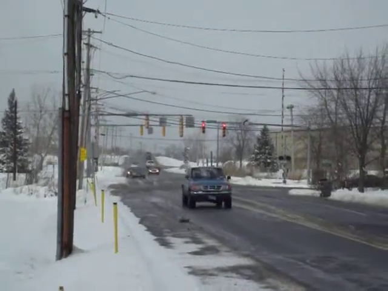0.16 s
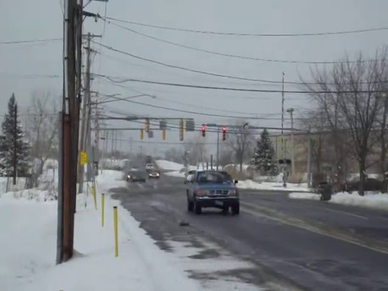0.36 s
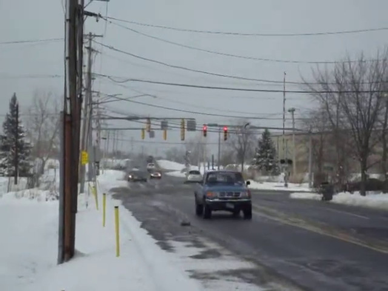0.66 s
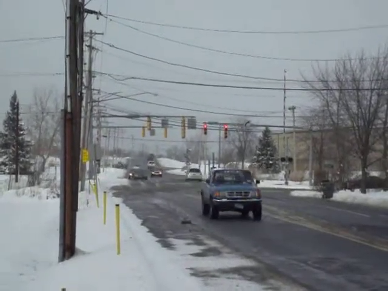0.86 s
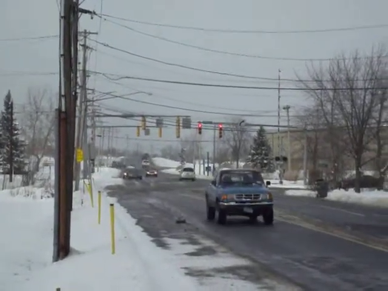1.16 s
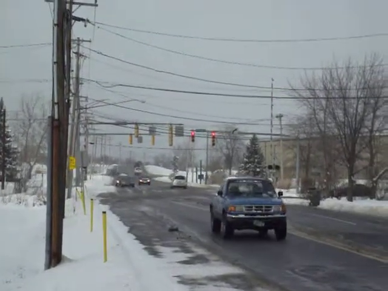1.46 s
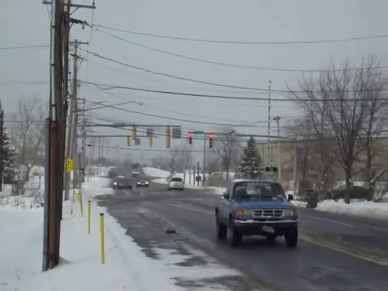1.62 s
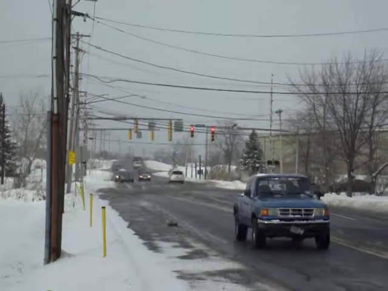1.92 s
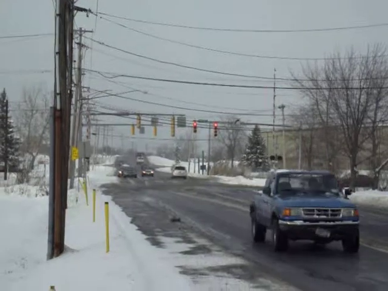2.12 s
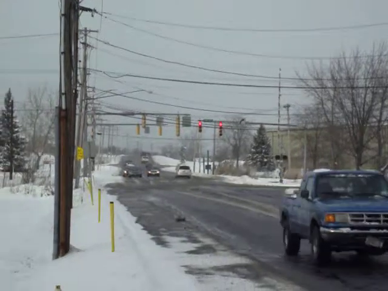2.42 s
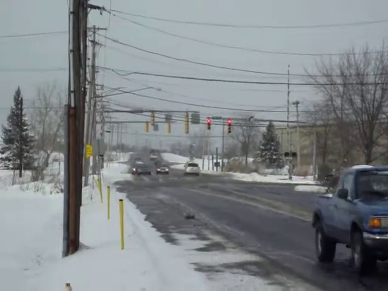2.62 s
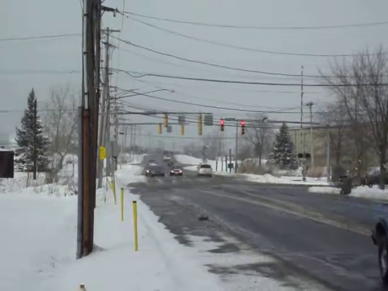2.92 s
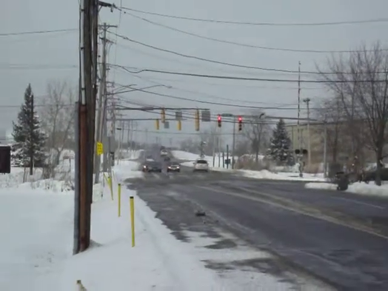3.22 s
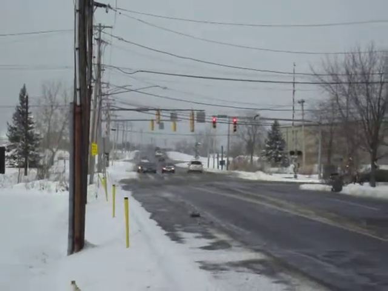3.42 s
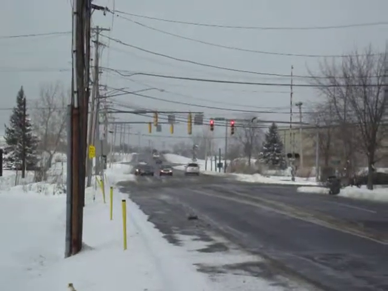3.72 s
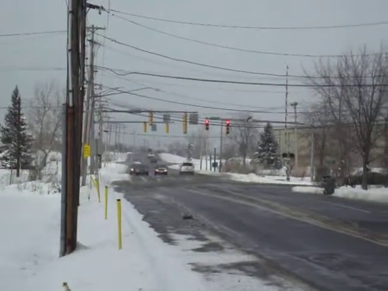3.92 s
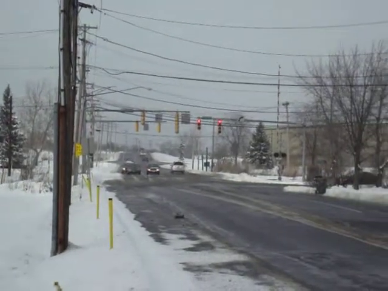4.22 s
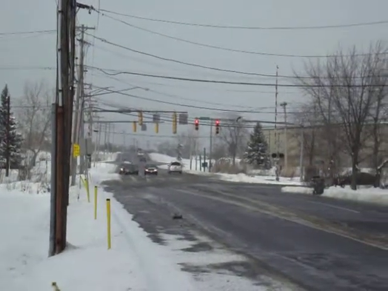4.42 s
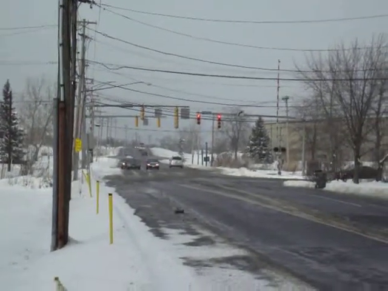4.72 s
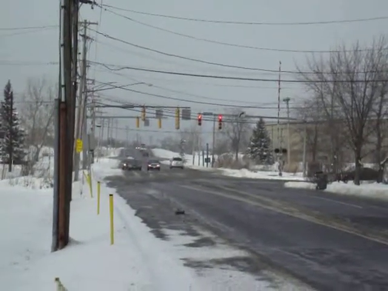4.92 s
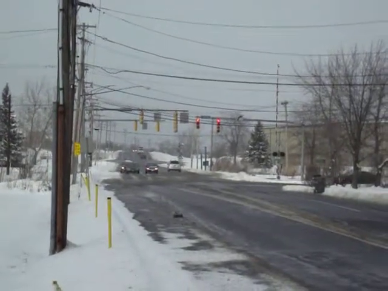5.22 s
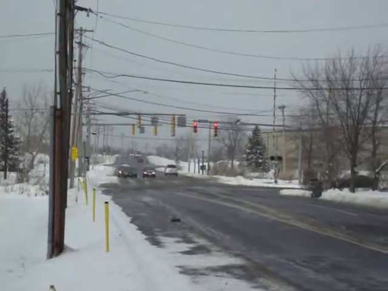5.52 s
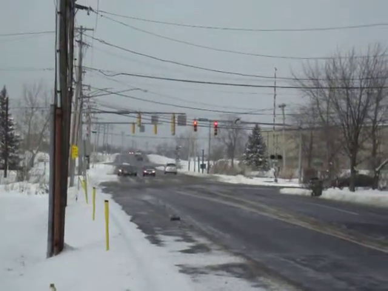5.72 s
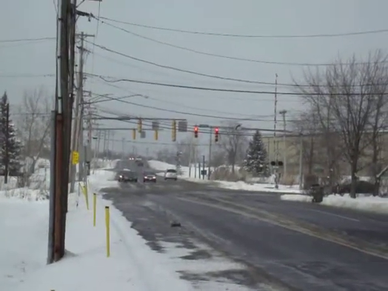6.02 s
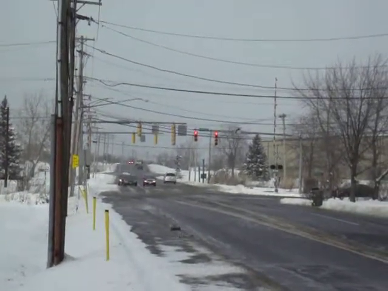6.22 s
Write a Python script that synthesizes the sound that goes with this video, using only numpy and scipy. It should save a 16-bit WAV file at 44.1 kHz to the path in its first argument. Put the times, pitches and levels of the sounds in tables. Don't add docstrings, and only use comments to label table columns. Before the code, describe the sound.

Roadside traffic in slush: the opening is loud, with a truck's deep engine hum, gusty rumble and sharp spray. It drops to distant wet traffic and a wavering low idle hum. A pickup comes up and sweeps past, front then rear tyres roaring and hissing, leaving trailing splashes and a steady wet wash. The sound is narrow, gritty and mono, dull in the highest treble, with wind thumps and brief clipping.

```python
import sys
import numpy as np
from scipy import signal
from scipy.fft import rfft, irfft
from scipy.io import wavfile
from scipy.ndimage import uniform_filter1d, minimum_filter1d

SR = 44100
rng = np.random.default_rng(int(sys.argv[2]) if len(sys.argv) > 2 else 0)


def dump(signal):
    limited = np.clip(np.atleast_2d(signal).T, -1, 1)
    pcm = np.round(limited * 32767).astype(np.int16)
    wavfile.write(sys.argv[1], SR, pcm)


def boost(x):
    u = np.asarray(x, float) / 20
    return 10 ** u


N = 280608
TIME_S = np.arange(N) / SR

# time in seconds, firing rate in Hz, exhaust level in dB.
TRUCK_RUN = [
    (0.0, 62.83, 1),
    (0.15, 61.9, 1.5),
    (0.6, 60.9, -2),
    (0.78, 61.5, -9),
    (0.95, 61.8, -6),
    (1.2, 62.5, -6.5),
    (1.38, 63.3, -12),
    (1.9, 64.7, -14.5),
    (2.6, 64, -17.5),
    (3.7, 65.86, -17.5),
]
# level in dB, drift in dB/s, beat in Hz,
# time of loudest beat in seconds, beat depth 0-1.
TRUCK_ORDERS = [
    (-26.5, -2.5, 1.2, .5, 0.5),
    (-21.5, 0.5, 2.45, 0.13, 0.3),
    (-29, 1.3, 4.9, .2, 0.3),
    (-19, -1.5, 3.7, 0.12, .25),
]
# time in seconds, shaft rate in Hz, exhaust level in dB,
# rasp of the upper orders in dB.
PICKUP_RUN = [(1.4, 52.22, -29, 5), (1.9, 51.1, -34.5, 0), (2.4, 50.2, -33, 2.5), (2.75, 49.48, -31.5, -2),
              (3.1, 48.6, -29.5, 7), (3.45, 47.8, -27.5, 5.5), (3.7, 47.74, -26, 7),
              (3.88, 47.23, -19.5, 1), (4.1, 47.14, -18, -4), (4.42, 44.8, -18, -0.5), (4.7, 45.07, -24, 0),
              (4.82, 44.98, -19.5, 0.5), (5.0, 44.45, -27, 0.5), (5.33, 44.45, -24, -2.5),
              (5.5, 45.6, -29, -1.5), (5.8, 46.0, -30.5, -0.5), (6.05, 45.5, -32.5, -7),
              (6.36, 46.8, -25, -5)]
# level in dB, drift in dB/s, beat in Hz,
# time of loudest beat in seconds, beat depth 0-1.
PICKUP_ORDERS = [
    (0, -0.3, 3.3, 3.5, 0),
    (-7.5, -0.3, 2.1, 3.3, 0.3),
    (-16, -1.5, 2.2, 3.75, 0.3),
]
# time in seconds, firing rate in Hz.
IDLE_RUN = [(1.2, 70.16), (1.9, 69.6), (2.35, 70.16), (2.95, 65.85), (3.35, 69), (3.55, 67.84),
            (3.95, 70.53), (4.35, 67.3), (4.75, 71), (5.35, 67.2), (5.8, 68.6), (6.36, 71)]
# time in seconds, level in dB.
IDLE_SWELLS = [(1.3, -27), (1.63, -30), (1.92, -23.5), (2.27, -24.5), (2.5, -22.5), (2.7, -26), (2.9, -31),
               (3.2, -25), (3.4, -27.5), (3.6, -35), (4.0, -29), (4.3, -35), (4.5, -27), (4.9, -28),
               (5.1, -26), (5.35, -26.5), (5.55, -23), (5.66, -24.5), (5.9, -23.5), (6.2, -24.5),
               (6.36, -22)]

# nearest at seconds, time to cover the sideways distance in seconds,
# fading over plain spreading (exponent).
TRUCK_PASS = (0.31, 0.56, 2.4)
FRONT_PASS = (3.28, 0.56, 2.03)
REAR_PASS = (4.09, 0.58, 1.74)
# far traffic in dB, truck in dB,
# pickup front axle in dB, pickup rear axle in dB.
LAYER_LEVELS = dict(boom=(-36.5, -25, -31, -22.5), roar=(-31.5, -25, -29.5, -21),
                pump=(-29.5, -26, -21.5, -25), spray=(-29, -21.5, -21, -19),
                rumble=(-42.5, -34.5, -40, -31), mist=(-53.5, -40, -47, -37), slush=(-35, -27, -22, -29),
                drum=(-61, -31.5, -56, -45.5), grooves=(-41.5, -45, -28, -35.5))
# lag behind truck in seconds, lag behind pickup's rear in seconds,
# share of wetness (ratio), share of roughness (ratio).
LAYER_RESPONSE = dict(boom=(0.25, 0.022, .05, 1.4), roar=(-0.042, -.05, -0.054, 0.98),
                  pump=(0.0058, 0.22, -.2, .1), spray=(0.16, 0.27, 1.8, .05),
                  rumble=(0.047, .03, 0.086, .3), mist=(0.26, 0.36, 1.1, .05),
                  slush=(-0.014, 0.32, .1, .05), drum=(0.39, .02, .05, .05), grooves=(.05, .3, .05, .05))
# time in seconds, wetness in dB, roughness in dB.
ROAD_SURFACE = [(0.0, 4.5, 1.5), (0.12, 1, -1), (0.45, -1.5, 0), (0.75, 0.5, -1), (0.95, 1.5, -2.5),
                (1.3, -0.5, -2), (1.85, -1, 0.5), (2.4, -0.5, 0.5), (2.75, 1, 1), (3.2, -1, -1),
                (3.5, 1, 1), (3.68, 2.5, -0.5), (4.1, -0.5, 1), (4.47, 0, 0), (4.72, 2, 1), (5.3, 0, 0.5),
                (5.65, -0.5, 0.5), (6.36, 0.5, 1)]
# nearest at seconds, span in seconds, share 0-1, lag in seconds.
BANK_ECHOES = [
    (3.29, .5, 0.27, 0.001867),
    (4.65, 0.74, 0.2, 0.001725),
    (.1, .3, 0, .0012),
]
# time in seconds, level in dB.
SPLASHES = [
    (0.0, -39),
    (0.66, -40.5),
    (0.9, -50.5),
    (1.25, -48),
    (1.6, -50),
    (3.6, -45),
    (4.36, -39),
    (5.08, -42),
    (5.24, -44),
    (5.39, -39.5),
]
# time in seconds, level in dB.
GUSTS = [(0.16, -19), (0.36, -25), (0.64, -20), (0.82, -23), (1.1, -31), (1.46, -27.5), (1.62, -23.5),
         (1.75, -34), (1.98, -31.5), (3.04, -26.5), (3.36, -29), (3.68, -25), (4.0, -27), (4.16, -31),
         (4.48, -28.5), (4.7, -29), (4.96, -29), (5.14, -27), (5.35, -29), (6.08, -28), (6.36, -30)]

# frequency in Hz, level in dB.
BOOM_BAND = [(230, -31), (300, -5), (350, 1.5), (430, 2), (520, -1), (600, -1), (760, -37)]
# frequency in Hz, level in dB.
ROAR_BAND = [(480, -21.5), (640, -2.5), (850, -0.5), (1000, -1.5), (1150, -7), (1500, -34.5)]
# frequency in Hz, level in dB.
PUMP_BAND = [(850, -24), (1150, -1.5), (1350, -1.5), (1600, -1), (1850, -3), (2300, -18)]
# frequency in Hz, level in dB.
GROOVE_BAND = [(760, -30), (880, -2), (1000, -16), (1200, -15.5), (1350, 1.5), (1520, -29.5)]
# frequency in Hz, level in dB.
SPRAY_BAND = [(2000, -36.5), (2400, -6), (2750, 2), (3000, -2.5), (3300, -11.5), (3700, -22), (4400, -37)]
# frequency in Hz, level in dB.
MIST_BAND = [(3000, -24), (3600, 0.5), (4000, -5.5), (4500, -11.5), (4900, -18.5), (5700, -27.5)]
# frequency in Hz, level in dB.
SLUSH_BAND = [(1500, -18), (1850, -10), (2100, -2.5), (2400, -4.5), (2900, -24)]
# frequency in Hz, level in dB.
DRUM_BAND = [(240, -30.5), (275, -0.5), (310, 0.7), (340, -5.5), (390, -29.5)]
# frequency in Hz, level in dB.
RUMBLE_BAND = [(35, -28.5), (60, -6), (90, -1.5), (120, 0), (160, -3.5), (240, -4.5), (300, -8), (400, -39)]
# frequency in Hz, level in dB.
WIND_BAND = [(8, -6), (20, -4), (45, -8), (70, -13), (140, -32.5)]

# time in seconds, loss in the
# converter in dB, overshoot lost after rebuilding in dB.
OVERLOADS = [(0.0319, -48, -36.5), (0.06, -15, -31.5), (0.0932, -24, -55.5), (0.1518, -13.0, -37),
             (0.2975, -37, -37), (0.3292, -23, -27.5), (0.3663, -39, -36), (0.4499, -21, -66.5),
             (0.4991, -21, -27), (3.505, -43, -35.5), (3.6014, -46, -27), (3.6329, -13, -25.0),
             (3.738, -30, -20), (3.755, -23.0, -24.5), (3.7831, -41.0, -31), (3.846, -43, -32.5),
             (3.9486, -14, -35.5), (3.978, -19, -35), (4.0707, -19.0, -40.5), (4.1134, -11.5, -26),
             (4.1502, -11, -43), (4.2205, -15, -44), (4.3272, -41.0, -28), (4.353, -14, -34),
             (4.366, -12, -47), (4.3806, -41.0, -34), (4.477, -28, -26), (4.6022, -29, -28.5),
             (4.6934, -23, -18), (6.361, -40, -22.5)]
# time in seconds, overshoot lost in dB.
GRAZES = [
    (0.216, -52),
    (0.526, -39),
    (3.467, -42.5),
    (3.7755, -42.5),
    (3.8633, -40),
    (3.8938, -37.5),
    (4.2143, -40),
    (4.4037, -39),
]


def read_curves(table):
    s, *columns = np.transpose(table)
    fade_in = np.clip((TIME_S - s[0]) / 0.2 + (s[0] < 0.1), 0, 1)
    fade_out = np.clip((s[-1] - TIME_S) / 0.2 + (s[-1] > 6.2), 0, 1)
    return [np.interp(TIME_S, s, column) for column in columns], fade_in * fade_out


def walk(rate_hz):
    hold = int(SR / rate_hz)
    steps = np.repeat(rng.standard_normal(N // hold + 1), hold)
    return 1.3 * uniform_filter1d(uniform_filter1d(steps, hold), hold)[:N]


def colour(x, band):
    hz, db = np.transpose(band)
    log_hz = np.log(np.arange(N // 2 + 1) * SR / N + 1)
    gain_db = np.interp(log_hz, np.log(hz), db, left=-120, right=-120)
    y = irfft(rfft(x) * boost(gain_db), N)
    return y / np.std(y)


def hiss(band, level_db, flicker_db, droplets=0.0):
    hits = rng.random(N) < 600 / SR
    drops = hits * boost(1.7 * rng.exponential(size=N)) * rng.standard_normal(N)
    grain = rng.standard_normal(N) + droplets * drops / np.std(drops)
    return colour(grain, band) * boost(level_db + flicker_db * walk(9))


def swells(events, rest_db, width_s):
    power = boost(2 * rest_db)
    for s, db in events:
        power = power + boost(2 * db) * np.exp(-((TIME_S - s) / width_s) ** 2)
    return 10 * np.log10(power)


def beating(level_db, orders):
    levels_db = []
    for db, drift_db, beat_hz, peak_s, depth in orders:
        since_s = TIME_S - peak_s
        beat = 1 + depth * np.cos(2 * np.pi * beat_hz * since_s)
        levels_db.append(level_db + db + drift_db * since_s + 20 * np.log10(beat))
    return levels_db


def engine(hz, levels_db, gate, orders, wander, lope_db):
    turn_rad = 2 * np.pi * np.cumsum(hz * (1 + wander * walk(13))) / SR
    tones = np.zeros(N)
    for order, db in zip(orders, levels_db):
        tone = np.sin(order * turn_rad + 2 * np.pi * rng.random())
        tones += boost(db + lope_db * walk(11)) * tone
    return np.sqrt(2) * gate * tones


def layer_db(name):
    far_db, *near_db = LAYER_LEVELS[name]
    truck_lag_s, rear_lag_s, wet_share, rough_share = LAYER_RESPONSE[name]
    passes = zip(near_db, (TRUCK_PASS, FRONT_PASS, REAR_PASS), (truck_lag_s, 0, rear_lag_s))
    power = boost(2 * far_db)
    for db, (near_s, across_s, fading), lag_s in passes:
        sideways = (TIME_S - near_s - lag_s) / across_s
        power = power + boost(2 * db) / (1 + sideways ** 2) ** fading
    (wet_db, rough_db), _ = read_curves(ROAD_SURFACE)
    return 10 * np.log10(power) + wet_share * wet_db + rough_share * rough_db


def truck_engine():
    (hz, db), gate = read_curves(TRUCK_RUN)
    return engine(hz, beating(db, TRUCK_ORDERS), gate, range(1, 5), wander=0.002, lope_db=0.5)


def truck_body():
    return hiss(DRUM_BAND, layer_db("drum"), 0.6)


def wind():
    return hiss(WIND_BAND, swells(GUSTS, rest_db=-37.5, width_s=0.099), 0.88)


def road_rumble():
    return hiss(RUMBLE_BAND, layer_db("rumble") + 10, 0.95)


def tyre_tread():
    tread = hiss(BOOM_BAND, layer_db("boom"), 0.78)
    tread += hiss(ROAR_BAND, layer_db("roar"), 0.14)
    tread += hiss(PUMP_BAND, layer_db("pump"), 0.5, droplets=0.3)
    for near_s, span_s, share, lag_s in BANK_ECHOES:
        echo = share * np.exp(-((TIME_S - near_s) / span_s) ** 2)
        delayed = np.roll(tread, int(lag_s * SR))
        tread = (tread - echo * delayed) / np.sqrt(1 + echo ** 2)
    return tread


def spray():
    return hiss(SPRAY_BAND, layer_db("spray"), 0.33, droplets=0.33)


def mist():
    splash_db = swells(SPLASHES, rest_db=-82, width_s=0.069)
    mist_db = 10 * np.log10(boost(2 * layer_db("mist")) + boost(2 * splash_db))
    return hiss(MIST_BAND, mist_db, 0.6, droplets=0.56)


def slush():
    return hiss(SLUSH_BAND, layer_db("slush"), 0.13, droplets=0.25)


def tyre_grooves():
    return hiss(GROOVE_BAND, layer_db("grooves"), 0.4)


def idling_cars():
    (hz,), gate = read_curves(IDLE_RUN)
    level_db = swells(IDLE_SWELLS, rest_db=-42, width_s=0.055)
    return engine(hz, [level_db], gate, [1], wander=0.012, lope_db=0.8)


def pickup_engine():
    (hz, db, rasp_db), gate = read_curves(PICKUP_RUN)
    second, third, fourth = beating(db, PICKUP_ORDERS)
    levels_db = [second, third + rasp_db, fourth + 0.3 * rasp_db]
    return engine(hz, levels_db, gate, range(2, 5), wander=0.002, lope_db=0.5)


def scene():
    truck = truck_engine() + truck_body()
    weather = wind() + road_rumble()
    tyres = tyre_tread() + tyre_grooves()
    water = spray() + mist() + slush()
    return (truck + weather + tyres + water + idling_cars() + pickup_engine())[None]


def lost_crests(events, step):
    out = np.zeros(-(-N // step))
    out[(events[:, 0] * SR / step).astype(int)] = boost(events[:, 1])
    return out


def band_limit(x):
    return signal.sosfilt(signal.butter(12, 15830, fs=SR, output="sos"), x)


def record(dry):
    ceiling, offset, slow = 0.7, 0.007, 4
    cut = np.array(OVERLOADS)
    duck = minimum_filter1d(np.minimum(1, ceiling / np.abs(dry + 1e-9)), size=88)
    gain = uniform_filter1d(uniform_filter1d(duck, size=44), size=44)
    held = dry * gain + offset
    samples = held[:, ::slow] - lost_crests(cut[:, :2], slow)
    samples = samples + boost(-49.5) * rng.standard_normal(samples.shape)
    rebuild = signal.firwin(numtaps=101, cutoff=5350, window=("kaiser", 9), fs=SR)
    wave = signal.resample_poly(samples, up=slow, down=1, axis=1, window=rebuild, padtype="edge")[:, :N]
    overshoots = lost_crests(np.vstack([cut[:, ::2], GRAZES]), step=1)
    wave = wave - np.convolve(overshoots, [0.52, 1, 0.52], "same")
    return band_limit(wave)


dry = scene()
out = record(dry)
dump(out)
```